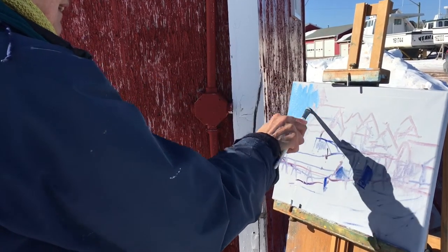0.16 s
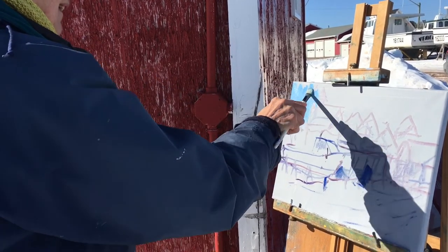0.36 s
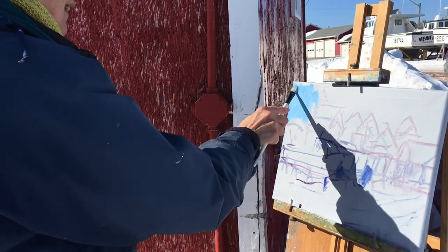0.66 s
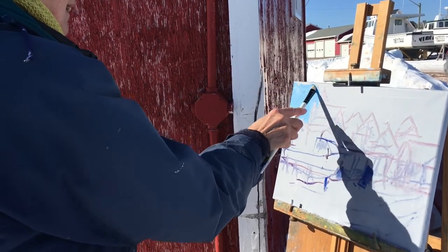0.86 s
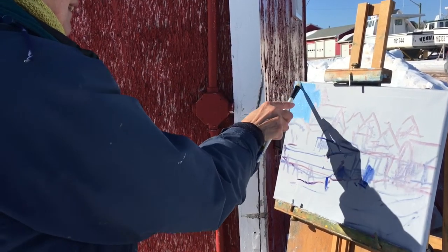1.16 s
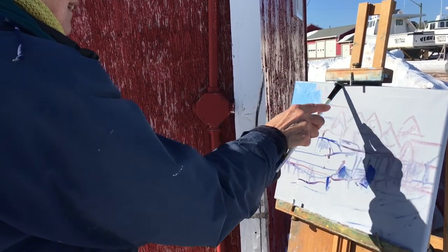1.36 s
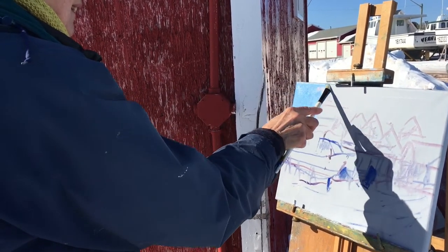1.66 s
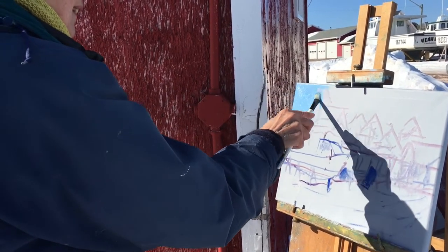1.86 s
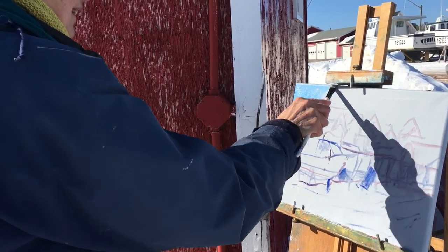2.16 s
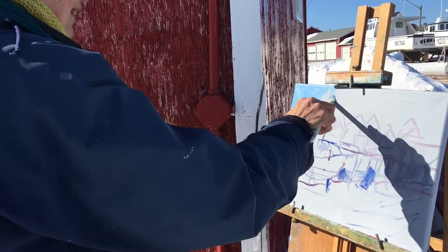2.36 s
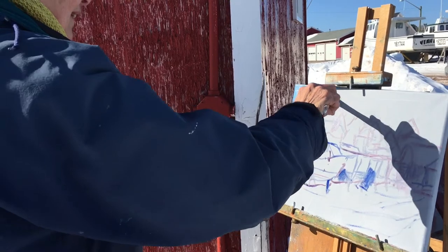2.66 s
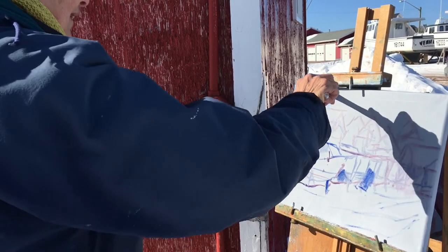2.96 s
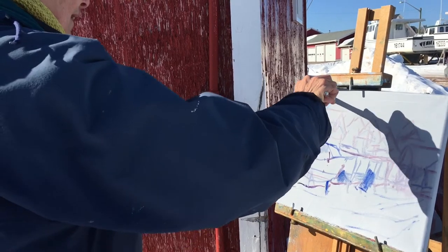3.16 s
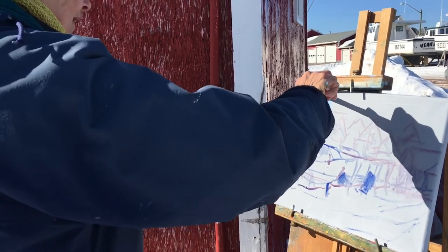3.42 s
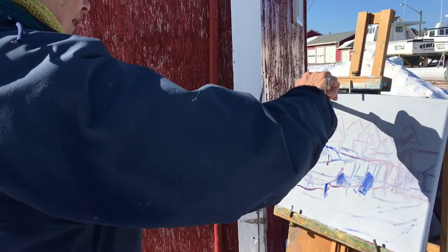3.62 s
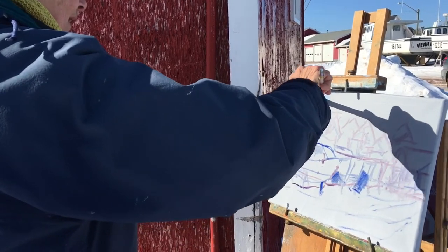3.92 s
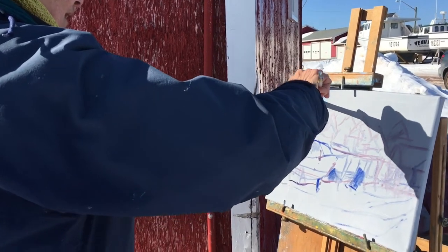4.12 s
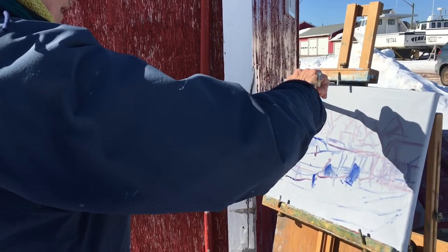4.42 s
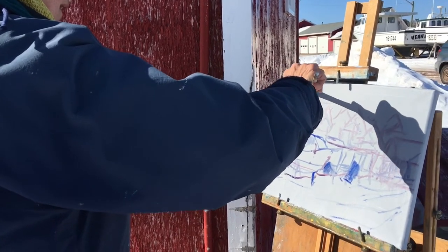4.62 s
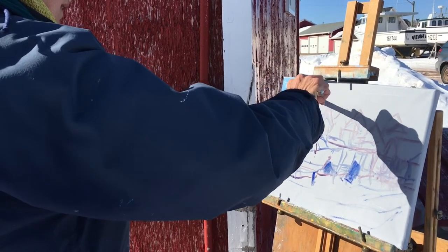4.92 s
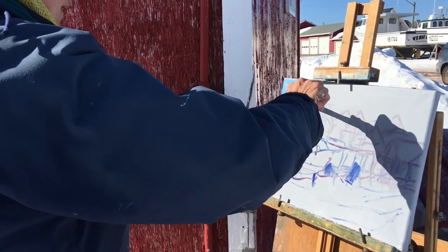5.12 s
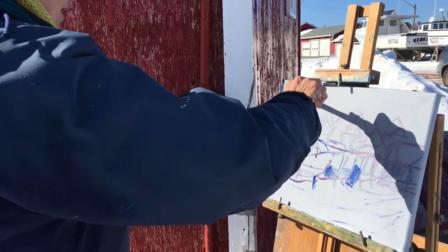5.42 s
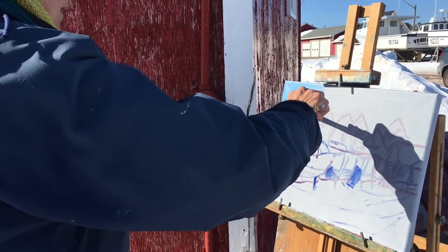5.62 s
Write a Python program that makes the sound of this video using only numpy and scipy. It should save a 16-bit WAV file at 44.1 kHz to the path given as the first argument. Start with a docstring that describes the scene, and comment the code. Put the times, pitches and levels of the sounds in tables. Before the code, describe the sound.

Outdoors, a bristle brush scrubs rapidly back and forth on a stretched canvas, each short stroke a bright airy hiss with a dry rasp and faint low drumming of the cloth. Small ticks and slight sleeve swishes slip in. Strokes soften midway as wind thuds and rumbles hard against the microphone, then return clearer, ending on the strongest swipe. Close, dry, single-channel pickup.

```python
"""Over a low wind rumble, a bristle brush scrubs paint to and fro on a stretched canvas on an easel, outdoors.
Each stroke is shaped noise that follows the brush speed: hair flicks hiss and rasp on the weave, and
noise through low resonances drums softly in the cloth. Short noise bursts make brush ticks and sleeve swishes.
Swelling rumble and push-pull pulses buffet the microphone, hardest a little past the middle, over faint open air."""
import sys
import numpy as np
from scipy import signal
from scipy.fft import rfft, irfft, next_fast_len
from scipy.io import wavfile
from scipy.ndimage import uniform_filter1d, map_coordinates

SR = 44100
rng = np.random.default_rng(int(sys.argv[2]) if len(sys.argv) > 2 else 0)


def to_wav(sig):
    """Store sig (one row per channel, or 1-D mono) as 16-bit WAV at the path in sys.argv[1].

    Samples outside -1..1 are clipped; the rate is SR.
    """
    pcm = np.clip(np.atleast_2d(sig), -1, 1) * 32767
    pcm = np.round(pcm).astype(np.int16)
    wavfile.write(sys.argv[1], SR, pcm.T)  # frames by channels


N = 254898
T = np.arange(N) / SR

# Levels in the tables set the balance inside a layer; each layer's trim comes on top.
# brush strokes, to and fro: (start t/s, end t/s, hiss level/dB, fastest point 0-1 of the stroke)
BRUSH_STROKES = [(0.084, 0.29, -48.5, 0.45), (0.283, 0.415, -53.5, 0.7), (0.392, 0.504, -53.5, 0.48),
                 (0.511, 0.71, -46, .48), (0.718, 0.876, -45.5, 0.54), (0.895, 1.132, -46, 0.45),
                 (1.114, 1.372, -49.5, 0.53), (1.377, 1.553, -52, 0.44), (1.546, 1.693, -45.5, 0.54),
                 (1.702, 1.822, -43.5, 0.53), (1.836, 1.955, -45, 0.63), (1.998, 2.08, -44.5, 0.36),
                 (2.057, 2.181, -45, 0.63), (2.214, 2.339, -46, 0.45), (2.322, 2.46, -53.5, 0.62),
                 (2.425, 2.589, -46, .77), (2.619, 2.706, -49.5, 0.38), (2.738, 2.856, -46, 0.52),
                 (2.891, 3.015, -52.5, .42), (2.96, 3.123, -54.5, 0.5), (3.115, 3.28, -58, 0.2),
                 (3.287, 3.37, -59, 0.44), (3.36, 3.555, -51.5, .56), (3.591, 3.73, -60.5, 0.32),
                 (3.703, 3.85, -55, .62), (3.9, 3.944, -60.5, 0.4), (3.992, 4.196, -58, .62),
                 (4.218, 4.31, -65, .66), (4.365, 4.51, -59.5, .61), (4.516, 4.587, -61.5, 0.62),
                 (4.55, 4.797, -48, 0.77), (4.813, 4.922, -51.5, 0.58), (4.905, 5.057, -49, .76),
                 (5.078, 5.19, -51, 0.48), (5.199, 5.327, -46.5, .64), (5.338, 5.443, -52.5, 0.66),
                 (5.452, 5.584, -48.5, 0.61), (5.606, 5.721, -45.5, 0.45), (5.703, 5.82, -37.5, .72)]
# moments when the tuft digs into the weave and rasps: (t/s, level/dB, half length/s)
TUFT_BITES = [(0.236, -49.5, .01), (0.292, -58, .005), (1.712, -54, .005), (1.784, -48.5, 0.021),
              (1.897, -57.5, .012), (1.944, -54, .005), (2.055, -58, .016), (2.115, -52, 0.01),
              (2.3, -56, .026), (2.485, -54, 0.0096), (2.529, -51.5, 0.013), (2.828, -55.5, 0.015),
              (2.923, -53, .005), (4.016, -56, 0.0079), (4.622, -56.5, 0.017), (5.034, -53.5, .009)]
# rasp of an ordinary stroke as the brush works its way over the cloth: (t/s, level/dB)
RASP_BALANCE = [(0, -56.5), (1.0, -56.5), (1.4, -63.5), (1.85, -58.5), (2.2, -60.5), (3.0, -57.5),
                (4.2, -58.5), (4.7, -53.5), (4.9, -60.5), (5.78, -56)]
# how freely the cloth drums where the brush is; it is stiffer near the frame: (t/s, level/dB)
CLOTH_SLACK = [(0, 4), (1.1, -9), (1.8, -9.5), (3, -3), (4.5, 6.5), (5.78, -3.5)]
# colour of the bristle hiss with the first grip: (f/Hz, level/dB per Hz)
HISS_FIRST_GRIP = [(1500, -32), (2600, -8), (3400, -9), (4900, -9.5), (5700, -1.5), (7700, -6), (10400, -4),
                   (12200, 1), (15800, -1.5)]
# colour of the bristle hiss that the changing grip leads towards: (f/Hz, level/dB per Hz)
HISS_SECOND_GRIP = [(1500, 2), (2600, -7), (3400, -11), (4900, -11.5), (5700, -2.5), (7400, -4), (9400, 1),
                    (10400, -5.5), (12200, -0.5), (15800, -1.5)]
# slow change of grip: (from t/s, to t/s)
GRIP_SPAN = [2.2, 6.9]
# colour of the cloth rasp: (f/Hz, level/dB per Hz)
RASP_COLOUR = [(300, -3), (470, -13.5), (560, -10.5), (760, -4), (900, 3.5), (1050, 3.5), (1150, -2),
               (1320, 3), (1480, -1.5), (1600, 0.5), (2000, -3), (2350, -12), (3300, -11), (6000, -25)]
# low modes of the stretched cloth: (f/Hz, width/Hz, level/dB)
CLOTH_MODES = [(81, 15, 1), (174.3, 12, -4), (224, 19, -8), (326, 27, -12.5)]
# small ticks of the brush on the canvas: (t/s, peak level/dB, brightness/dB per octave)
BRUSH_TICKS = [(1.837, -39, 12), (1.854, -37, 2), (1.867, -43.5, -10), (2.075, -36, 17), (2.587, -41, -6),
               (3.031, -39, 8), (3.084, -40.5, 2.5), (3.144, -40.5, -1.5), (3.217, -35.5, -1)]
# colour of a tick before its brightness: (f/Hz, level/dB per Hz)
TICK_COLOUR = [(100, -22), (1000, 8.5), (2000, -7), (5000, -5), (15000, -15), (20000, -48)]
# jacket sleeve swishing as the arm moves: (t/s, level/dB, half length/s, centre f/Hz, width/octaves)
SLEEVE_SWISHES = [(1.284, -56, 0.044, 3270, 0.33), (1.434, -53, 0.02, 3660, 0.58),
                  (1.856, -53.5, 0.0031, 4760, 0.2), (2.157, -63, 0.025, 3600, 0.38)]
# strength of the breeze at the microphone: (t/s, level/dB)
BREEZE = [(0.0, -41.5), (0.45, -45.5), (0.75, -43), (1.1, -44), (1.9, -50), (2.7, -49.5), (3.12, -54),
          (3.42, -52), (3.56, -31.5), (3.82, -23), (3.99, -35.5), (4.28, -32.5), (4.43, -47), (4.58, -50.5),
          (4.8, -36), (5.2, -51), (5.78, -54)]
# soft puffs on top of the breeze: (t/s, level/dB, half length/s)
BREEZE_PUFFS = [(0.32, -37, .014), (0.673, -37.5, 0.017), (1.248, -35.5, 0.031), (1.45, -34.5, .065),
                (1.611, -37.5, .01), (2.16, -44, 0.038), (2.778, -41.5, 0.0093), (3.22, -36, 0.0069),
                (3.302, -39.5, .015), (3.454, -31, 0.023), (3.528, -23, 0.016), (3.732, -24, .03),
                (4.121, -35, 0.0054), (4.386, -32, 0.011), (4.479, -33, 0.017), (4.662, -37.5, 0.017),
                (4.824, -34, 0.052), (4.998, -34.5, 0.029), (5.11, -45, 0.032), (5.256, -49, 0.014),
                (5.442, -40.5, 0.026), (5.592, -42, 0.017)]
# eddies that hit the microphone: (t/s, peak level/dB, spectral scale f/Hz, raggedness 0-1)
MIC_EDDIES = [(0.129, -26, 78, 0.13), (0.655, -31.5, 89, 0.15), (0.754, -26.5, 75, 0.3),
              (1.435, -22, 90.5, 0.33), (2.608, -19, 150.5, .05), (3.273, -19.5, 67, 0.14),
              (3.536, -12, 111, .17), (3.602, -21.5, 151, 0.64), (3.662, -16.5, 154, 0.65),
              (3.684, -25.5, 260, 0.7), (3.722, -28.5, 190, .5), (3.743, -16.5, 305, 0.4),
              (3.786, -22.5, 310, 0.6), (3.806, -15.5, 310, 1), (3.828, -14.5, 267, 0.46),
              (3.879, -16, 330, .8), (3.888, -17, 494, 0.45), (3.903, -28, 298, .9), (4.055, -14, 195, .44),
              (4.186, -13, 202, 0.22), (4.196, -14.5, 297, 0.49), (4.748, -17.5, 183, 0.18),
              (4.854, -30.5, 130, .2), (4.996, -36, 120, 0.2)]
# colour of the deep wind rumble: (f/Hz, level/dB per Hz)
RUMBLE_COLOUR = [(25, -35), (40, -3), (60, 5), (120, -2.5), (180, -6.5), (260, -26), (400, -46), (800, -85)]
# colour of the finer turbulence: (f/Hz, level/dB per Hz)
TURBULENCE_COLOUR = [(60, -13), (150, 8.5), (270, 9.5), (420, -7.5), (650, -17), (1100, -28), (2200, -72)]
# colour of the quiet open air: (f/Hz, level/dB per Hz)
AIR_COLOUR = [(25, 2), (60, -1), (200, -10.5), (450, -26), (950, -17.5), (2000, -23.5), (4500, -32),
              (8000, -33.5), (15800, -31.5)]
# strength of the open air: (t/s, level/dB)
AIR_STRENGTH = [(0, -51.5), (3.1, -53.5), (3.9, -58.5), (4.4, -57), (5.78, -55.5)]

USUAL_STROKE_S, USUAL_HISS_DB = 0.13, -51  # an ordinary stroke
BRIGHT_DB, BRIGHT_DB_PER_HALVING, BRIGHT_PER_DB = 0.1, 2, 0.23  # shorter, stronger strokes are brighter
RASP_PER_DB = 0.44  # the rasp grows more slowly than the hiss
HISS_SPEED_LAW, RASP_SPEED_LAW = 2.21, 1.72  # exponent of each layer's power against brush speed
WAKE_DB, WAKE_RISE_S, WAKE_FALL_S = -15, 0.02, 0.023  # rumble around each eddy, against its peak
EDDY_S, EDDY_SHRINK = 0.0061, 0.75  # half length of a 100 Hz burst; how fast it falls as the scale rises
BURST_TAIL = 1.15  # a burst dies away this much more slowly than it builds
TOP_HZ = 15900  # upper band limit


def brush():
    """Strokes speed up and stop; bristles hiss on the weave, rasp and set the cloth drumming."""
    hiss_power, rasp_power, tilt_db = stroke_motion()
    pressure_db = 1.05 * wobble(45) + 1.0 * wobble(130)  # the tuft catches and lets go
    hiss = bristle_hiss(hiss_power, tilt_db, pressure_db)
    rasp = cloth_rasp(rasp_power, pressure_db)
    return hiss + rasp + cloth_drum(rasp_power)


def stroke_motion():
    """Brush speed arcs up and down in each stroke and drives hiss power, rasp power and brightness."""
    hiss_power, rasp_power, tilt_db = np.zeros(N), np.zeros(N), np.zeros(N)
    for start, end, hiss_db, fastest in BRUSH_STROKES:
        on = (T > start) & (T < end)
        progress = (T[on] - start) / (end - start)
        # bend time so that the sine peaks at the fastest point
        bend = np.log(.5) / np.log(np.clip(fastest, .1, .9))
        speed = np.abs(np.sin(np.pi * progress ** bend))
        effort_db = hiss_db - USUAL_HISS_DB
        bright_db = BRIGHT_DB + BRIGHT_PER_DB * effort_db
        bright_db += BRIGHT_DB_PER_HALVING * np.log2(USUAL_STROKE_S / (end - start))
        hiss_power[on] += amp(hiss_db) ** 2 * speed ** HISS_SPEED_LAW
        rasp_power[on] += amp(RASP_PER_DB * effort_db) ** 2 * speed ** RASP_SPEED_LAW
        tilt_db[on] += bright_db * speed
    rasp_power *= amp(curve(RASP_BALANCE)) ** 2
    return hiss_power, rasp_power, tilt_db


def bristle_hiss(power, tilt_db, pressure_db):
    """Dense hair flicks on the weave; the colour drifts with the grip and tilts with each stroke."""
    flicks = shifting(bristles(rate=9000, spread_db=3.5, share=0.59), depth_db=1.64)
    grip = np.interp(T, GRIP_SPAN, [0, 1])
    hiss = (1 - grip) * coloured(flicks, HISS_FIRST_GRIP) + grip * coloured(flicks, HISS_SECOND_GRIP)
    # the tip of the tuft sounds brighter than its flat side
    top = filtered(hiss, lambda hz: 1 / (1 + (9500 / (hz + 1)) ** 6))
    tilted = top + (hiss - top) * amp(-tilt_db)
    return tilted * np.sqrt(power) * amp(pressure_db + 0.51 * tilt_db + 2.0)


def cloth_rasp(stroke_power, pressure_db):
    """Sparser flicks over a rub, coloured by the cloth, swell with the strokes and where the tuft bites."""
    bite_power = sum(amp(db) ** 2 * np.exp(-((T - s) / length) ** 2) for s, db, length in TUFT_BITES)
    rasp = coloured(shifting(bristles(rate=900, spread_db=1.0, share=0.35), depth_db=3.0), RASP_COLOUR)
    return rasp * np.sqrt(stroke_power + bite_power) * amp(pressure_db + 0.85 * wobble(70) + 1.38)


def cloth_drum(stroke_power):
    """Noise rings the low modes of the stretched cloth, as freely as its slack allows."""
    def response(f):
        modes = sum(amp(db) * 1j * f * width / (centre * centre - f * f + 1j * f * width)
                    for centre, width, db in CLOTH_MODES)
        return modes / (1 + (f / 350) ** 4)

    return np.sqrt(stroke_power) * unit(filtered(noise(), response)) * amp(curve(CLOTH_SLACK))


def bristles(rate, spread_db, share):
    """Hairs flick off the threads, about rate times a second: uneven tiny clicks over a smooth rub."""
    flicks = (rng.random(N) < rate / SR) * noise()
    flicks = flicks * amp(spread_db * np.clip(noise(), -2, 2))
    share = np.clip(share, 0, 1)  # the flicks' share of the power
    return np.sqrt(share) * unit(flicks) + np.sqrt(1 - share) * noise()


def shifting(x, depth_db):
    """The contact point wanders over the cloth, so its resonances swell and fade."""
    spectrum = signal.stft(x, nperseg=512)[2]
    field = uniform_filter1d(rng.standard_normal(spectrum.shape), size=5, axis=0)  # smooth over frequency
    field = unit(uniform_filter1d(field, size=12, axis=1))  # and over time
    return unit(signal.istft(spectrum * amp(depth_db * field), nperseg=512)[1][:N])


def ticks():
    """Stiff hairs snap against the cloth: dry clicks of a few milliseconds."""
    out, t = np.zeros(N + SR), np.arange(SR // 20) / SR
    envelope = amp(-60 * t / 0.013) * (1 - np.exp(-t / 0.00072))
    for s, db, bright_db in BRUSH_TICKS:
        colour = [(hz, level + bright_db * np.log2(hz / 2000)) for hz, level in TICK_COLOUR]
        snap = coloured(noise(), colour)[:len(t)] * envelope
        out[round(s * SR):][:len(t)] += amp(db - 1) * snap / np.abs(snap).max()
    return out[:N]


def sleeve():
    """Smooth fabric slides over itself in short, narrow swishes of band-limited noise."""
    out = np.zeros(N)
    for s, db, length, centre_hz, octaves in SLEEVE_SWISHES:
        def band(hz):
            return np.exp(-.5 * (np.log2((hz + 1) / centre_hz) / octaves) ** 2)

        rub = unit(filtered(noise(), band))
        out += amp(db) * rub * np.exp(-.5 * ((T - s) / length) ** 2)
    return out


def near_walls(x, wet_db, t60):
    """Easel, arm and shed wall send back a brief, dense answer: noise that falls 60 dB in t60 seconds."""
    t = np.arange(SR // 16) / SR
    tail = rng.standard_normal(len(t)) * amp(-60 * t / t60) * (t > .001)
    return x + amp(wet_db) * signal.fftconvolve(x, tail / np.linalg.norm(tail))[:N]


def wind():
    """Lumpy rumble swells in puffs and around eddies; stronger gusts add more of a higher turbulence."""
    power = amp(curve(BREEZE)) ** 2
    for s, db, length in BREEZE_PUFFS:
        power += amp(db) ** 2 * np.exp(-((T - s) / length) ** 2)
    for s, db, *_ in MIC_EDDIES:
        wake_length = np.where(T < s, WAKE_RISE_S, WAKE_FALL_S)
        power += amp(db + WAKE_DB) ** 2 * np.exp(-((T - s) / wake_length) ** 2)
    level_db = 10 * np.log10(power) + 1.36 * wobble(35)
    rumble = amp(level_db - 3) * coloured(noise(), RUMBLE_COLOUR)
    # turbulence is held back in weak wind
    finer_db = np.minimum(0.78 * (level_db + 21.5), 0)
    turbulence_db = level_db + finer_db - 8 + 4.2 * wobble(80)
    return rumble + amp(turbulence_db) * coloured(noise(), TURBULENCE_COLOUR)


def eddies():
    """Each eddy gives the microphone one push and pull with a ragged burst on it; small ones are shorter."""
    out = np.zeros(N)
    for s, db, scale_hz, raggedness in MIC_EDDIES:
        fineness = scale_hz / 100
        length = EDDY_S / fineness ** EDDY_SHRINK * np.where(T < s, 1, BURST_TAIL)
        u = (T - s) * scale_hz * 2 * np.pi
        push = -u / (1 + (u / 2) ** 2) ** 2
        ragged = unit(filtered(noise(), lambda hz: np.exp(-hz / scale_hz) * hz / (hz + 250)))
        eddy = push + raggedness * ragged * np.exp(-.5 * ((T - s) / length) ** 2)
        out += amp(db) * eddy / np.abs(eddy).max()
    return out


def open_air():
    """The quiet outdoors: coloured noise with a slowly drifting level."""
    return amp(curve(AIR_STRENGTH)) * coloured(noise(), AIR_COLOUR)


def amp(db):
    """Decibels to gain."""
    return 10 ** (np.asarray(db) / 20)


def unit(x):
    """Scale to rms 1."""
    return x / np.sqrt(np.mean(x ** 2) + 1e-20)


def curve(rows):
    """(t/s, value) rows, one value per sample."""
    return np.interp(T, *np.transpose(rows))


def wobble(rate):
    """A smooth random curve, rate knots a second."""
    return map_coordinates(rng.standard_normal(int(N * rate / SR) + 4), [T * rate])


def filtered(x, response):
    """x times a response of frequency."""
    m = next_fast_len(N + SR // 2)
    return irfft(rfft(x, m) * response(np.fft.rfftfreq(m, 1 / SR)), m)[:N]


def coloured(x, points):
    """x through a (f/Hz, level/dB) spectrum, at rms 1."""
    f, db = np.transpose(points)
    return unit(filtered(x, lambda hz: amp(np.interp(np.log(hz + 1), np.log(f), db))))


def noise():
    """White noise."""
    return rng.standard_normal(N)


def scene():
    """Brush, ticks and sleeve with their near echo, then wind, eddies and the quiet open air."""
    air = open_air()
    painting = near_walls(brush() + ticks() + sleeve(), wet_db=-11, t60=0.047)
    return (painting + wind() + eddies() + air)[None]


def record(dry):
    """Roll off the deepest bass and cut everything above the band limit."""
    thinned = signal.sosfilt(signal.butter(4, 37, "highpass", fs=SR, output="sos"), dry[0])
    return filtered(thinned, lambda hz: hz < TOP_HZ)[None]


dry = scene()
out = record(dry)
to_wav(out)
```